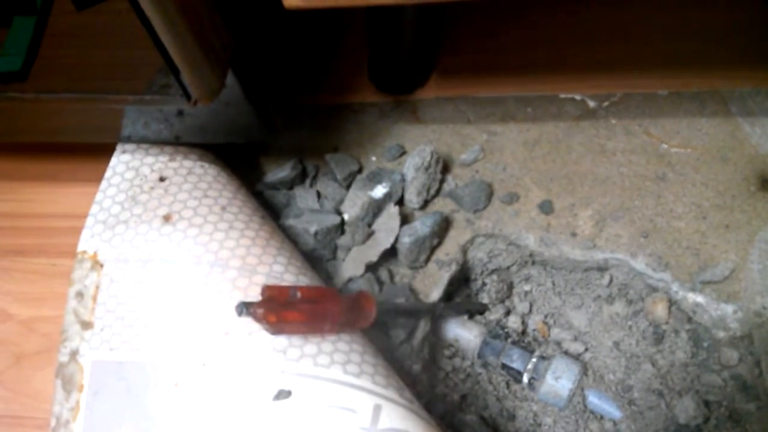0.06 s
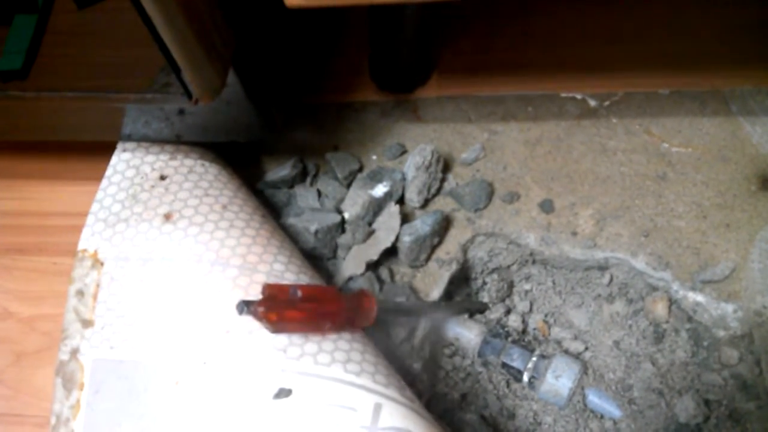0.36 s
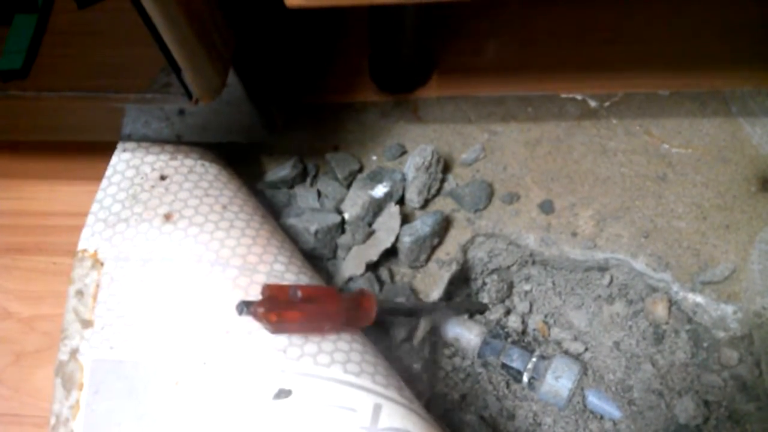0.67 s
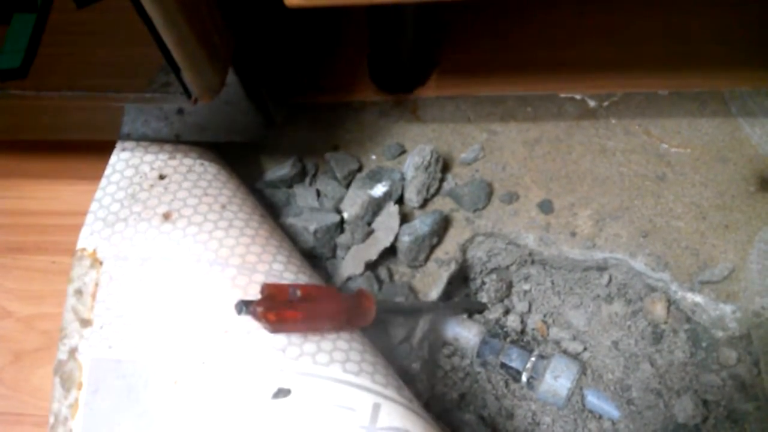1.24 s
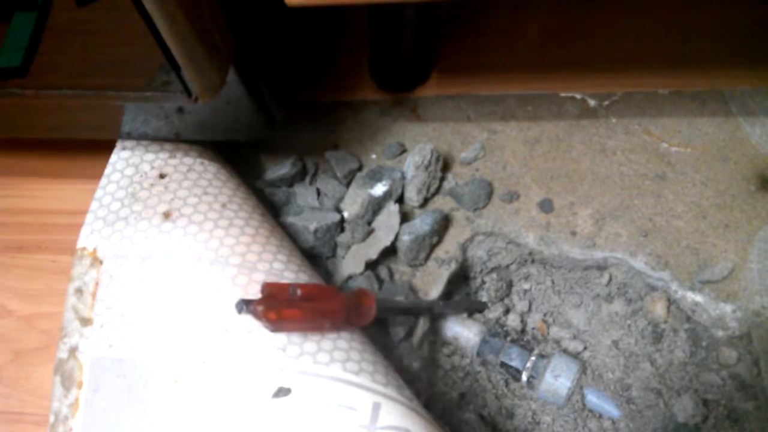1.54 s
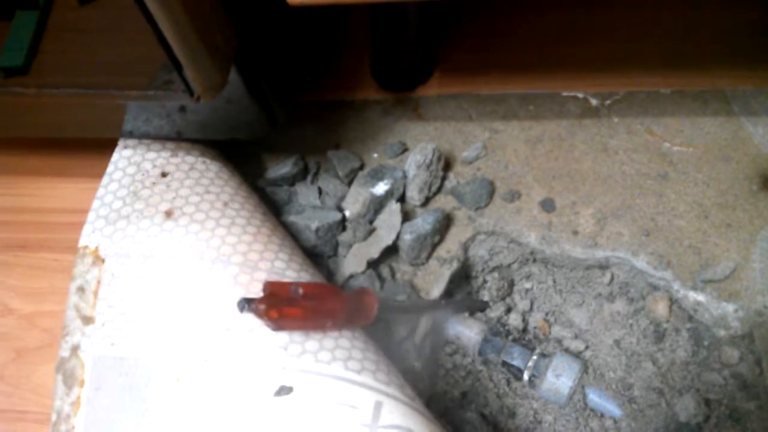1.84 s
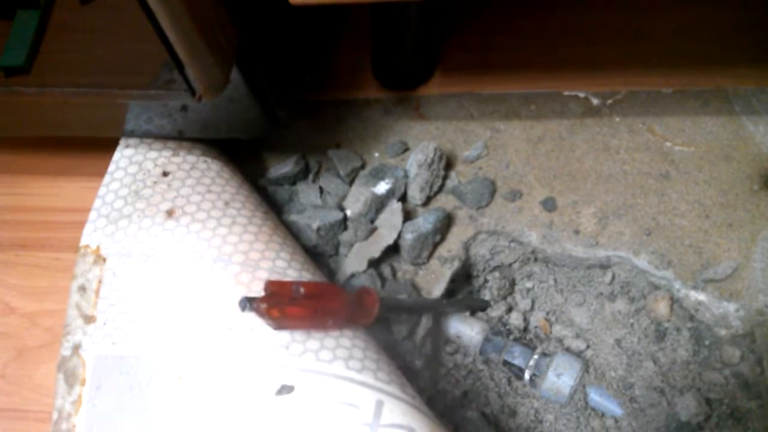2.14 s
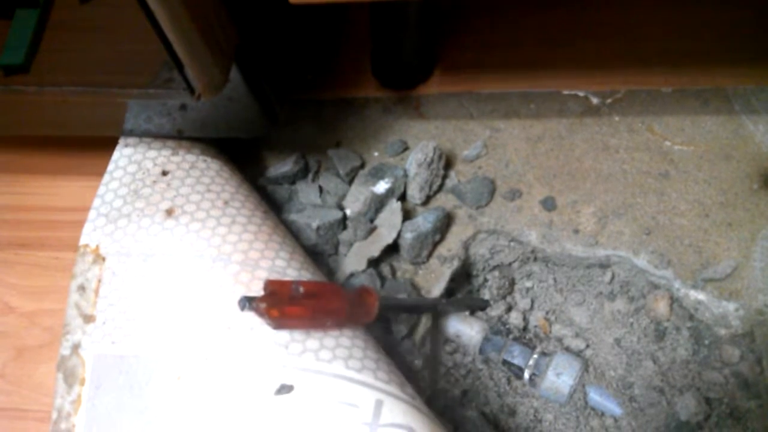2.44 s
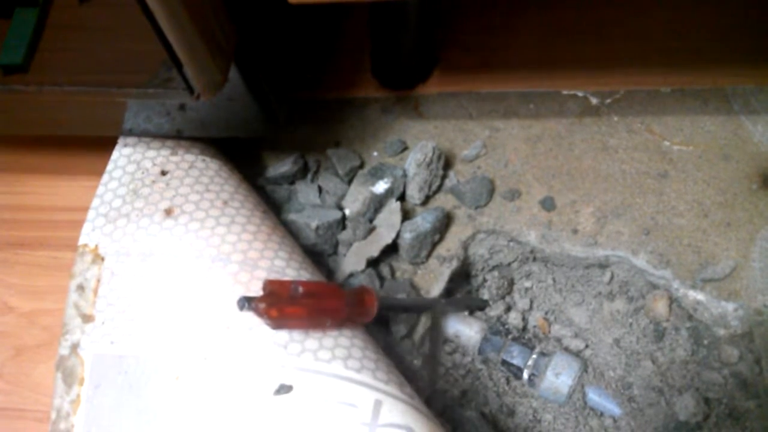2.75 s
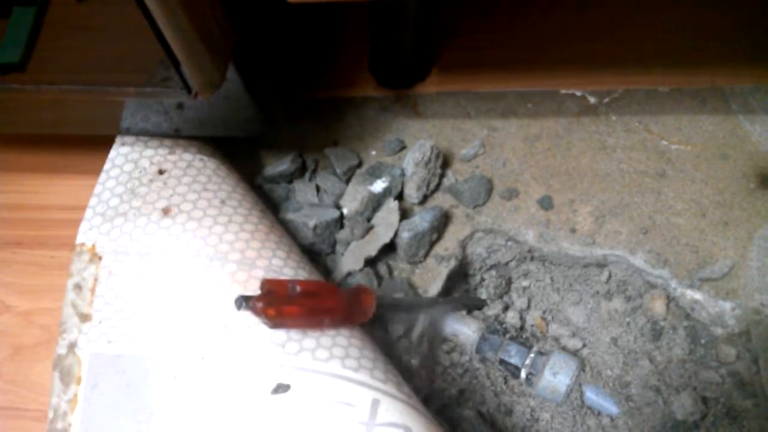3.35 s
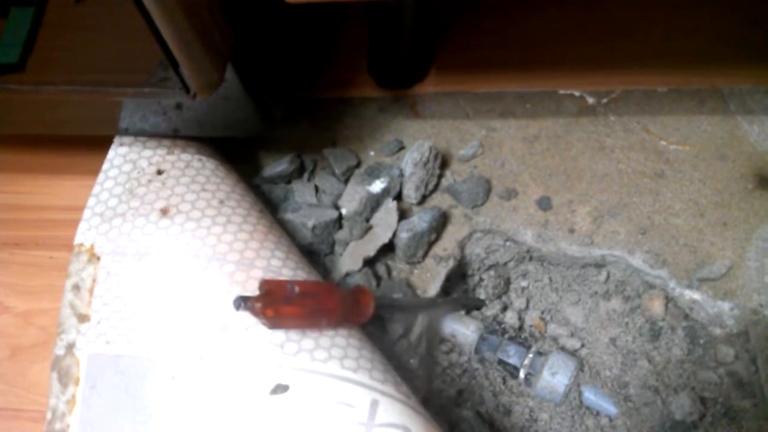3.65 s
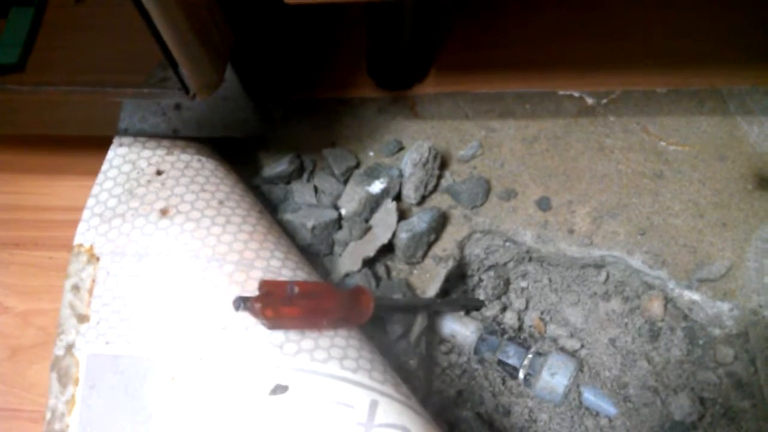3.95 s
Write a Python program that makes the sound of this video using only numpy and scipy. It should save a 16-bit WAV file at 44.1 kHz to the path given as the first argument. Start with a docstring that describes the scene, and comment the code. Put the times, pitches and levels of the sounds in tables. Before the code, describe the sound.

Short hissing, squeaky spurts of air and water escape from a leaking pipe joint.

```python
"""Spitting pipe joint.

Air and water spurt from a leaking joint in a dug-up floor indoors. In each spurt a slit snaps open,
widens and shuts: its squeal swoops down and back up inside a bright hiss. Nearly shut, the slit rasps;
wide open, it only hisses and sprays. A thin seep and a low room hum go on between spurts."""
import sys
import numpy as np
from scipy import signal
from scipy.fft import rfft, irfft
from scipy.io import wavfile
from scipy.ndimage import uniform_filter1d, minimum_filter1d

SR = 44100
rng = np.random.default_rng(int(sys.argv[2]) if len(sys.argv) > 2 else 0)


def int16_out(signal):
    """Quantize to a 16-bit WAV file."""
    q = np.round(np.clip(np.atleast_2d(signal).T, -1, 1) * 32767)
    wavfile.write(sys.argv[1], SR, q.astype(np.int16))


N = 176400
TIME_S = np.arange(N) / SR

# One list per spurt, opening to closing; wider slit, lower pitch: time_s, pitch_hz
SPURTS = [
    [(0.0, 7380), (0.017, 3990), (0.03, 2130), (0.058, 800), (0.085, 2050), (0.094, 4710), (0.101, 6900),
     (0.114, 9500)],
    [(0.351, 9500), (0.37, 8400), (0.42, 7760), (0.47, 5460), (0.49, 4230), (0.508, 3920), (0.528, 4540),
     (0.545, 6870), (0.577, 9500)],
    [(0.74, 9200), (0.746, 7660), (0.765, 4560), (0.785, 3820), (0.8, 4490), (0.815, 6360), (0.838, 8700),
     (0.858, 9500)],
    [(0.928, 9200), (0.935, 7610), (0.952, 4680), (0.974, 2140), (0.988, 1630), (1.005, 2100),
     (1.017, 3100), (1.027, 6200), (1.046, 9500)],
    [(1.213, 9300), (1.22, 7270), (1.235, 5030), (1.248, 4500), (1.26, 4990), (1.273, 6300), (1.3, 8800),
     (1.325, 9500)],
    [(1.371, 9300), (1.381, 7470), (1.398, 4970), (1.425, 2200), (1.44, 1810), (1.458, 2590), (1.47, 4670),
     (1.478, 7380), (1.493, 9500)],
    [(1.711, 9300), (1.72, 7280), (1.737, 6900), (1.775, 7640), (1.815, 8800), (1.845, 7580), (1.87, 6530),
     (1.903, 5570), (1.925, 6180), (1.95, 7840), (1.983, 9500)],
    [(2.077, 9000), (2.082, 7320), (2.094, 4290), (2.107, 2120), (2.14, 700), (2.172, 2050), (2.182, 4540),
     (2.191, 6830), (2.21, 9500)],
    [(2.314, 9100), (2.319, 7320), (2.329, 4610), (2.34, 2840), (2.353, 2410), (2.367, 3080), (2.379, 4680),
     (2.39, 7490), (2.408, 9500)],
    [(2.573, 9000), (2.577, 7070), (2.585, 4540), (2.597, 2390), (2.609, 1890), (2.622, 2660),
     (2.637, 4570), (2.648, 7490), (2.666, 9500)],
    [(2.832, 9200), (2.838, 7000), (2.849, 4920), (2.862, 4180), (2.877, 5270), (2.893, 7630),
     (2.915, 9500)],
    [(3.047, 9000), (3.051, 7070), (3.059, 4450), (3.068, 2470), (3.093, 700), (3.119, 1900), (3.128, 3300),
     (3.134, 6200), (3.148, 9500)],
    [(3.398, 9500), (3.408, 7940), (3.443, 4440), (3.476, 2110), (3.497, 1550), (3.519, 2590),
     (3.532, 4680), (3.542, 7310), (3.562, 9500)],
    [(3.703, 9200), (3.709, 7280), (3.721, 4180), (3.746, 2770), (3.777, 4680), (3.795, 7340),
     (3.815, 8800), (3.835, 9400), (3.865, 7460), (3.888, 4830), (3.908, 2480), (3.945, 800), (3.974, 2000),
     (3.983, 4660), (3.99, 7180), (4.0, 9400)],
]
# Layer gain against slit pitch: pitch_hz, gain_db
SQUEAL_GAIN = [(1000, -45), (1700, -23.5), (2400, -12), (3200, -11.5), (4600, -14), (6000, -12.5),
               (7500, -11.5), (8500, -15.5), (9500, -24)]
RASP_GAIN = [(6500, -60), (7500, -19), (8200, -21.5), (8900, -14.5), (9500, -15)]
HISS_GAIN = [(800, -39), (1700, -26), (2500, -26), (4000, -33), (6000, -23.5), (7500, -21.5), (8700, -14.5),
             (9500, -28.5)]
SPRAY_GAIN = [(800, -50.5), (2000, -50.5), (3500, -56.5), (6000, -64.5), (9500, -59.5)]
FIZZ_GAIN = [(800, -24.5), (2500, -19.5), (5000, -25.5), (8000, -20), (9500, -23)]

# Squeal line width: pitch_hz, width_hz
SQUEAL_WIDTH = [(1500, 24), (3000, 11.1), (5500, 17.5), (7500, 15), (8300, 263), (9500, 1084)]
# Squeal partials: multiple, gain_db
SQUEAL_HARMONICS = [(1, 0), (2, -5), (3, -6), (4, -23)]
# Squeal trim while the slit shuts: pitch_hz, gain_db
CLOSING_TRIM = [(2000, -3.5), (3500, -2), (4600, 1), (6000, 0), (8000, -1.5)]
# Squeal breaks up a fifth, if end is after start: start_s, end_s
BREAK_SPANS = [(0.529, 0.54), (1.016, 1.02), (1.258, 1.272), (3.126, 3.1)]
# Rasp tuning: slit_pitch_hz, rasp_pitch_hz
RASP_TUNING = [(6000, 3700), (8400, 4700), (8900, 4600), (9500, 5100)]
# Second edge, one list per whistle while the slit lingers nearly shut: time_s, pitch_hz
EDGE_GLIDES = [
    [(.351, 5506), (.365, 3887), (.38, 3220), (.405, 2916), (.43, 2125)],
    [(1.775, 2897), (1.795, 3900), (1.816, 4500), (1.832, 3700), (1.85, 2250)],
    [(3.806, 3000), (3.817, 5100), (3.833, 6180), (3.85, 5000), (3.87, 2720)],
]
# Second edge chirps just before the slit shuts: start_s
CHIRP_STARTS_S = [.556, 0.836, 1.298, 1.959, 3.543]
# Chirp contour: offset_s, pitch_hz
CHIRP_GLIDE = [(0, 3109), (.007, 5664), (.013, 5000), (.024, 4440)]
# Drops bursting in the slit: start_s, level_db
DROP_BURSTS = [(1.302, -13.5), (3.549, -15.5)]

# Broad response of the joint and the hollow around it: freq_hz, gain_db
JOINT_RESPONSE = [(500, -47), (1800, -41.5), (2500, -40.5), (3200, -28), (3900, -15.5), (4400, -0.5),
                  (5550, 4.5), (6050, -8.5), (6400, -4), (7500, -2), (8100, -3.5), (8700, 1.5), (10600, 3),
                  (11800, -5), (12700, -29), (13800, -14), (15500, -18)]
# Narrow resonances and notches of the pipe: freq_hz, lift_db
PIPE_MODES = [(2430, 18), (2800, 10), (3050, 13.5), (3280, 13.5), (3900, 7), (4384, 4.5), (4809, -1),
              (5384, 2.5), (6050, -1), (6414, 8), (6808, 8.5), (7450, 7), (10607, 3.5)]
# Resonances of the hole in the floor: freq_hz, lift_db
HOLE_MODES = [(550, 9), (665, 1), (880, 8)]
# Reflections off rubble and floor: delay_s, gain_db
ECHOES = [(.0046, -15.5), (.0083, -24)]

# Noise spectra, shape only: freq_hz, density_db
FIZZ_SPECTRUM = [(2000, -39), (4500, -9), (6500, -8.5), (8500, -1.5), (10300, 5), (11800, -1.5),
                 (12800, -13), (15500, -6.5)]
SPRAY_SPECTRUM = [(250, -20), (520, 1), (1100, -3), (1800, 7), (3000, -10.5), (6000, -4)]
SEEP_SPECTRUM = [(1300, -31.5), (2800, -26.5), (4000, -24), (4900, -11), (6000, -15), (7600, -10.5),
                 (8300, -13.5), (9800, -2), (11200, -11), (11800, -6.5), (12500, -18), (15500, -17)]
ROOM_SPECTRUM = [(25, -10.5), (45, 6.5), (75, 1), (100, -12), (140, -2.5), (200, -10), (290, -8.5),
                 (400, -18), (620, -11.5), (800, -19), (1100, -29), (2000, -18.5), (3200, -42)]
# Seep envelope: time_s, level_db
SEEP_LEVEL = [(0, -44), (2.6, -43.5), (3.22, -43), (3.38, -51), (3.5, -35.5), (3.69, -45.5)]
# Electric hum: freq_hz, level_db
HUM_LINES = [(120, -70), (135, -74.5), (340, -69.5)]
# Faint hollow background tones: centre_s, length_s, freq_hz, width_hz, level_db
FAINT_TONES = [(0.177, 0.085, 3230, 130, -61.5), (0.734, 0.15, 671, 6.4, -63.5),
               (2.038, 0.093, 187, 77, -60.5), (2.054, 0.093, 427, 52, -58.5),
               (2.19, 0.19, 1840, 1700, -56.5), (2.4, 1, 244, 150, -66.5), (2.556, 0.11, 455, 110, -61),
               (3.184, 0.12, 678, 8, -64)]


def leak(rasp_duck_db=-0.5, thud_db=-11):
    """Whistles and hiss ring in the joint; fizz and spray come from the jet outside."""
    pitch_hz, flow = slit()
    hiss = rng.standard_normal(N) * gain_at(HISS_GAIN, pitch_hz) * flutter(rate_hz=130, depth_db=4.5)
    fizz = noise(FIZZ_SPECTRUM) * gain_at(FIZZ_GAIN, pitch_hz) * flutter(rate_hz=320, depth_db=1)
    spray = noise(SPRAY_SPECTRUM) * gain_at(SPRAY_GAIN, pitch_hz) * flutter(rate_hz=250, depth_db=2)
    drops = spits()
    edge, edge_gate = second_edge()
    whistles = squeal(pitch_hz) + edge + rasp(pitch_hz) * from_db(rasp_duck_db * edge_gate)
    thuds = from_db(thud_db) * colour(drops, SPRAY_SPECTRUM)
    spatter = ringing(flow * spray + thuds, HOLE_MODES)
    return joint(flow * (whistles + hiss) + drops) + flow * fizz + spatter


def slit(attack_s=0.003, release_s=0.004, surge_db=10, surge_s=0.003):
    """Slit pitch and flow; stored pressure makes each spurt start louder."""
    pitch_hz, flow = np.ones(N), np.zeros(N)
    for spurt in SPURTS:
        points = np.array(sorted(spurt), float)
        since_s = TIME_S - points[0, 0] + attack_s / 4
        until_s = points[-1, 0] - TIME_S + release_s / 4
        is_open = (since_s > 0) & (until_s > 0)
        pitch_hz[is_open] = glide(points, TIME_S[is_open])
        gate = np.minimum(1, np.minimum(since_s / attack_s, until_s / release_s))
        flow[is_open] = gate[is_open] * from_db(surge_db * np.exp(-since_s[is_open] / surge_s))
    return pitch_hz, flow


def squeal(pitch_hz, fifth_db=-12, break_duck_db=-15):
    """Slit whistle with overtones; while shutting it sputters and may break up a fifth."""
    closing = uniform_filter1d((np.gradient(pitch_hz) > 0) * 1., size=800)
    in_break = sum(1. * (TIME_S > start_s) * (TIME_S < end_s) for start_s, end_s in BREAK_SPANS)
    broken = uniform_filter1d(in_break, size=130)
    phase = unsteady_phase(pitch_hz, at_hz(SQUEAL_WIDTH, pitch_hz))
    tone = sum(from_db(db) * np.sin(k * phase) * (k * pitch_hz < SR / 2) for k, db in SQUEAL_HARMONICS)
    trim_db = closing * at_hz(CLOSING_TRIM, pitch_hz) + broken * break_duck_db
    gain = gain_at(SQUEAL_GAIN, pitch_hz) * from_db(trim_db) * flutter(rate_hz=230, depth_db=0.7)
    sputter = flutter(rate_hz=180, depth_db=2 * closing)
    fifth = broken * from_db(fifth_db) * np.sin(1.5 * phase)
    return tone * gain * sputter + fifth


def rasp(pitch_hz):
    """Rough lower whistle of the nearly shut slit."""
    phase = unsteady_phase(at_hz(RASP_TUNING, pitch_hz), width_hz=253.3)
    return np.sin(phase) * gain_at(RASP_GAIN, pitch_hz) * flutter(rate_hz=1300, depth_db=3)


def second_edge(gain_db=-14, octave_db=-10, ramp_s=0.004):
    """A second edge whistles lower, with one overtone. Returns sound and gate."""
    chirps = [[(start_s + offset_s, hz) for offset_s, hz in CHIRP_GLIDE] for start_s in CHIRP_STARTS_S]
    tones, gates = np.zeros(N), np.zeros(N)
    for whistle in EDGE_GLIDES + chirps:
        points = np.array(sorted(whistle), float)
        gate = np.clip(np.minimum(TIME_S - points[0, 0], points[-1, 0] - TIME_S) / ramp_s, 0, 1)
        phase = unsteady_phase(glide(points, TIME_S), width_hz=28)
        tones += gate * (np.sin(phase) + from_db(octave_db) * np.sin(2 * phase))
        gates += gate
    return from_db(gain_db) * tones, gates


def spits(decay_s=0.00035):
    """Drops burst in the slit as ticks of noise."""
    envelope = sum(from_db(db) * (TIME_S >= start_s) * np.exp(-np.abs(TIME_S - start_s) / decay_s)
                   for start_s, db in DROP_BURSTS)
    return envelope * rng.standard_normal(N)


def joint(x):
    """Broad colour of the joint, then the pipe's narrow modes."""
    return ringing(colour(x, JOINT_RESPONSE), PIPE_MODES)


def room(x, t60_s=0.26, tail_db=-20):
    """Direct sound, close echoes, faint diffuse tail."""
    echoes = sum(from_db(db) * np.interp(TIME_S - delay_s, TIME_S, x, left=0) for delay_s, db in ECHOES)
    tail = rng.standard_normal(SR) * from_db(-60 * TIME_S[:SR] / t60_s)
    return x + echoes + from_db(tail_db) * signal.fftconvolve(x, tail / np.linalg.norm(tail))[:N]


def seep():
    """Thin hiss that never stops."""
    level_db = np.interp(TIME_S, *np.transpose(SEEP_LEVEL))
    return noise(SEEP_SPECTRUM) * from_db(level_db) * flutter(rate_hz=46, depth_db=0.5)


def room_tone(noise_db=-63.5):
    """Electric hum and low room noise."""
    hum = sum(np.sqrt(2) * from_db(db) * np.sin(unsteady_phase(hz, width_hz=1.58))
              for hz, db in HUM_LINES)
    return hum + from_db(noise_db) * noise(ROOM_SPECTRUM)


def faint_tones():
    """Noise bands that swell and fade."""
    tones = np.zeros(N)
    for centre_s, length_s, hz, width_hz, db in FAINT_TONES:
        band = resonance(rng.standard_normal(N), hz, width_hz)
        band = unit_rms(resonance(band, hz, width_hz))
        swell = np.exp(-(2 * (TIME_S - centre_s) / length_s) ** 2)
        tones += from_db(db) * band * swell
    return tones


def glide(points, time_s):
    """Pitch in Hz: cubic curve in log pitch through the points."""
    knot_s, log_hz = points[:, 0], np.log(points[:, 1])
    time_s = np.clip(time_s, knot_s[0], knot_s[-1])
    k = np.clip(np.searchsorted(knot_s, time_s) - 1, 0, len(knot_s) - 2)
    slope = np.gradient(log_hz, knot_s)
    step_s, rise = np.diff(knot_s)[k], np.diff(log_hz)[k]
    u = (time_s - knot_s[k]) / step_s
    bend = (1 - u) * (slope[k] * step_s - rise) - u * (slope[k + 1] * step_s - rise)
    return np.clip(np.exp(log_hz[k] + u * rise + u * (1 - u) * bend), 100, SR / 4)


def unsteady_phase(hz, width_hz, wobble_hz=785):
    """Phase of a tone widened by random wobble: turbulence, in the whistles."""
    wobble = np.sqrt(2 * np.pi * np.abs(width_hz) / SR) * slow_noise(wobble_hz)
    return np.cumsum(2 * np.pi * hz / SR + wobble)


def flutter(rate_hz, depth_db):
    """Randomly wavering gain; depth is rms."""
    return from_db(depth_db * unit_rms(slow_noise(rate_hz)))


def slow_noise(cutoff_hz):
    """Low-passed white noise."""
    return signal.sosfilt(signal.butter(2, cutoff_hz, fs=SR, output="sos"), rng.standard_normal(N))


def noise(spectrum):
    """Coloured noise, unit power."""
    return unit_rms(colour(rng.standard_normal(N), spectrum))


def colour(x, spectrum, size=4096):
    """Minimum-phase filter with the given spectrum."""
    cepstrum = irfft(np.log(gain_at(spectrum, np.fft.rfftfreq(size, 1 / SR))))
    cepstrum[1:size // 2] *= 2
    cepstrum[size // 2 + 1:] = 0
    impulse = irfft(np.exp(rfft(cepstrum)))
    return signal.fftconvolve(x, impulse)[:N]


def ringing(x, modes, width_hz=60):
    """Lift or notch narrow bands."""
    return x + sum((from_db(db) - 1) * resonance(x, hz, width_hz) for hz, db in modes)


def resonance(x, hz, width_hz):
    """One resonance, unit peak gain."""
    return signal.lfilter(*signal.iirpeak(hz, hz / width_hz, fs=SR), x + 1e-18)


def at_hz(table, hz):
    """Read a table on a log-frequency axis."""
    knot_hz, values = np.transpose(table)
    return np.interp(np.log(np.maximum(hz, 1)), np.log(knot_hz), values)


def gain_at(table, hz):
    """Read a dB table as gain."""
    return from_db(at_hz(table, hz))


def from_db(db):
    """Decibels to gain."""
    return 10 ** (np.asarray(db) / 20)


def unit_rms(x):
    """Scale to unit power."""
    return x / np.sqrt(np.mean(x ** 2) + 1e-20)


def scene():
    """The leak in its room, mono."""
    return (room(leak()) + seep() + room_tone() + faint_tones())[None]


def record(dry, ceiling=0.92, cutoff_hz=15800):
    """Smooth peak limiter, then a steep low-pass."""
    gain = minimum_filter1d(np.minimum(1, ceiling / (np.abs(dry) + 1e-9)), size=161)
    limited = dry * uniform_filter1d(uniform_filter1d(gain, size=81), size=81)
    return signal.sosfilt(signal.ellip(12, 0.1, 80, cutoff_hz, fs=SR, output="sos"), limited)


dry = scene()
out = record(dry)
int16_out(out)
```